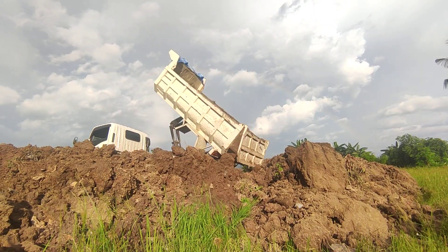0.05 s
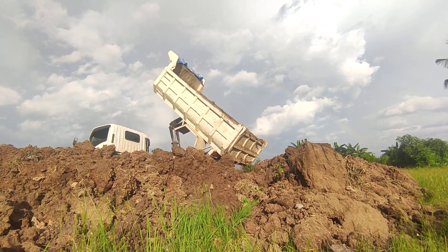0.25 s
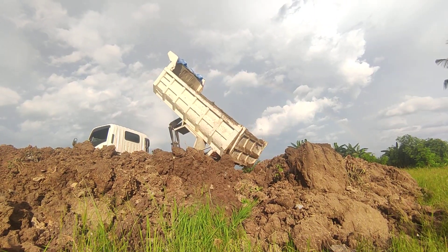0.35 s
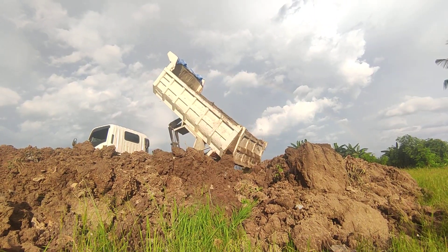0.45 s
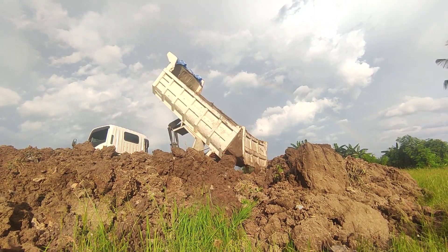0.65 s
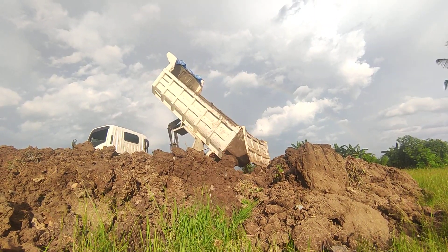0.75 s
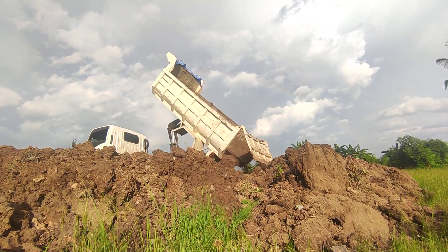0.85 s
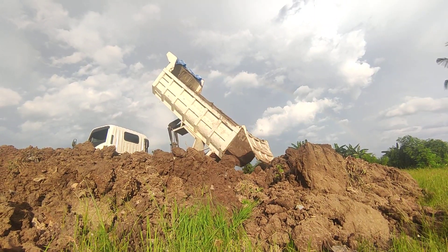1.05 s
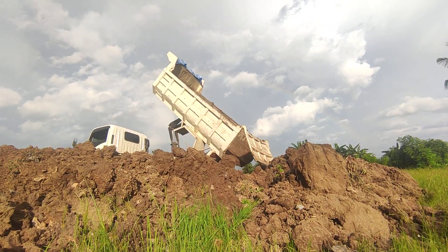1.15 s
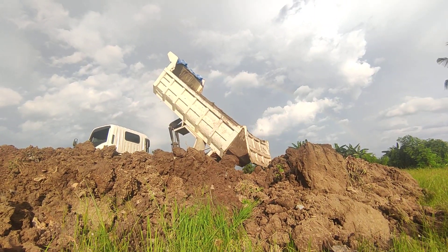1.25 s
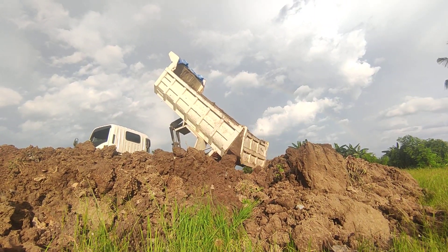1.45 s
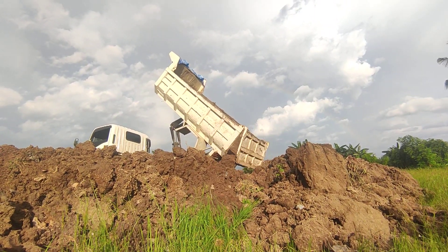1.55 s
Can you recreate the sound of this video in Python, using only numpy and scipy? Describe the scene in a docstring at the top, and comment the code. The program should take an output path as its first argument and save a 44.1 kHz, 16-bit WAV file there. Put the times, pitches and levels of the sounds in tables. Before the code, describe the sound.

A heavy steel tailgate slams at 0.2 s: a sharp clank with rapid rebounds until about 0.26 s, low thumps to 0.31 s, bright latch jingle, and a hollow bed boom fading over roughly half a second. Quiet diesel rumble, sliding soil and faint hiss lie beneath. Small scratchy, perhaps bird-like chirps run throughout, slightly left, with thin whistles near 1.2 and 1.3 s. Open field, little echo.

```python
"""Open field with earth mounds, a tipper truck idling: filtered noise throbs as its diesel and hisses as air.
Soil, grains in coloured noise, slides off. Close by, something small, perhaps a bird, gives scratchy chirps
(clicks and noise through resonances) and two thin whistles (wavering tones). The steel tailgate swings shut
against the raised bed: a noise-burst clank at first contact, every contact ringing through random plate modes,
and decaying sines for the thumps, the gate panel, the boom of the empty body and the bright latch jingle."""
import sys
import numpy as np
from scipy import signal
from scipy.fft import rfft, irfft
from scipy.io import wavfile
from scipy.ndimage import uniform_filter1d

SR = 44100
rng = np.random.default_rng(int(sys.argv[2]) if len(sys.argv) > 2 else 0)


def generate_wav(sig):
    """Save sig (samples, or channels by samples) to the path in sys.argv[1] as 16-bit PCM at SR."""
    pcm = np.round(np.clip(np.atleast_2d(sig).T, -1, 1) * 32767).astype(np.int16)
    wavfile.write(sys.argv[1], SR, pcm)


N = 70560

# stereo image of the broad noises: (frequency [Hz], side minus mid [dB])
STEREO_WIDTH = [(60, -24), (150, -24), (500, -13), (1000, -9), (2000, -6), (4000, -1.5), (12000, -1)]

# sliding soil, loudness: (time [s], level [dB])
SOIL_LEVEL = [(0, -48.5), (.1, -47.5), (.4, -41), (.55, -42), (.75, -38), (.9, -42.5), (1.1, -42),
              (1.25, -45), (1.4, -45), (1.6, -45)]
# sliding soil, colour: (frequency [Hz], relative density [dB per Hz])
SOIL_COLOUR = [(60, -45), (170, 8.5), (260, -8.5), (350, -3), (520, 2), (680, -9.5), (1150, -4.5),
               (1800, -15), (3000, -18.5), (7000, -29.5), (15000, -28)]
CLODS_PER_S, CLOD_SPREAD_DB = 1400, -3.5

# engine rumble, loudness: (time [s], level [dB])
ENGINE_LEVEL = [(0, -45), (.1, -46), (.45, -39), (.8, -43), (1.1, -43.5), (1.35, -43), (1.6, -45)]
# engine rumble, colour: (frequency [Hz], relative density [dB per Hz])
ENGINE_COLOUR = [(20, -15), (45, -13), (75, 0), (110, -0.5), (170, -0.5), (215, -0.5), (260, -10),
                 (500, -30), (1000, -41)]
FIRING_HZ, FIRING_DEPTH = 41, 0.15  # mean rate; depth as a share of the amplitude

# faint outdoor hiss, loudness: (time [s], level [dB])
AIR_LEVEL = [(0, -46.5), (.45, -43.5), (.7, -54), (1.1, -55.5), (1.6, -54.5)]
# faint outdoor hiss, colour: (frequency [Hz], relative density [dB per Hz])
AIR_COLOUR = [(1000, -0.5), (2600, -4), (3600, 7.5), (4400, -5), (5400, 3.5), (6500, 0.5), (7400, -31),
              (9200, -2.5), (12000, -17.5), (15500, -41)]

# scratchy bursts: (start [s], length before release [s], mid-burst level [dB],
#                   resonance [Hz], resonance against rasp [dB])
CHIRP_BURSTS = [(0.016, 0.033, -41, 6050, -7), (0.162, 0.03, -39.5, 5540, -1),
                (0.365, 0.044, -39.5, 5500, -5), (0.493, 0.0098, -46, 3700, 5.5),
                (0.531, 0.054, -42, 5630, -7.5), (0.627, 0.018, -39.5, 3670, -2.5),
                (0.714, 0.0068, -36, 3710, -4.5), (0.767, 0.0046, -37, 3620, -8),
                (0.783, 0.0058, -41, 4620, 2.5), (0.836, 0.017, -39.5, 3780, 1),
                (0.905, 0.0048, -39.5, 4800, -1.5), (0.943, 0.0097, -39, 5040, -15),
                (0.956, 0.025, -40.5, 4840, -4), (1.006, 0.012, -41.5, 5200, -5),
                (1.022, 0.017, -37, 3630, -16), (1.089, 0.014, -40, 3930, 0),
                (1.146, 0.0079, -56, 3500, 8.5), (1.189, 0.011, -39.5, 3680, -0.5),
                (1.211, 0.028, -49.5, 3550, 7), (1.288, 0.068, -45.5, 3300, -2.5),
                (1.41, 0.066, -40.5, 5660, -5.5), (1.539, 0.073, -43.5, 5700, 0.5)]
# rasp under every burst: (frequency [Hz], relative density [dB per Hz])
RASP_COLOUR = [(1500, -2), (2700, -5), (3500, 8.5), (4150, 2.5), (4900, 4), (6200, -7.5), (7400, -16),
               (8600, -10), (10000, -1.5), (12300, -21), (15500, -43.5)]
# left-right tilt of the chirps and whistles: (frequency [Hz], left minus right [dB])
CHIRP_BALANCE = [(3000, 5), (5000, 3), (6500, 6), (9000, -7), (10200, 1.5), (11500, 12), (15000, 46.5)]
# thin whistles: (start [s], length before release [s], mean pitch [Hz], level [dB])
WHISTLE_NOTES = [(1.199, 0.031, 3410, -36), (1.299, 0.047, 3348, -37.5)]
WHISTLE_WOBBLE, WHISTLE_THIRD_DB = .024, -9  # rms share of pitch; third harmonic
CHIRP_ATTACK_S, CHIRP_RELEASE_S = .002, .0035  # release is a time constant
CHIRP_SAG_DB_PER_S, CHIRP_ROUGH_DB = 34, 2.4
# half-width of the resonance in a long burst; short bursts have no time to settle on a narrow one
CHIRP_WIDTH_HZ, CHIRP_SETTLE_S = 196, 0.006
OVERTONE_HZ, OVERTONE_WIDTH_HZ, OVERTONE_DB = 11360, 1500, -19.5
GRAINS_PER_S, GRAIN_DB = 630, -14
PORT_LAG_S = 0.0003578  # the right port hears the chirps later
CHIRP_ECHO_DB, CHIRP_ECHO_T60_S = -8.5, .12

# tailgate contacts: (time [s], level [dB])
GATE_BLOWS = [(0.2031, -1), (0.2146, 1), (0.2236, -2), (0.238, -13), (0.262, -6)]
# the gate's mass lands and lands again: (time [s], level [dB])
GATE_THUMPS = [(0.2031, -1.5), (0.259, -5), (0.312, -10.5)]
THUMP_HZ, THUMP_DB, THUMP_T60_S = 126, -9, 0.074
# first steel-on-steel contact, resonances: (frequency [Hz], half-width [Hz], level [dB])
CLANK_RESONANCES = [(1806, 34, 0.5), (1830, 260, -1.5), (2037, 90, -5), (2773, 50, -3), (3820, 910, -2.5)]
CLANK_DB, CLANK_SPREAD_DB = -8.5, -7  # spread: unshared noise against shared noise
CLANK_HOLD_S, CLANK_T60_S = 0.0034, 0.04
# crowd of weaker plate modes, colour: (frequency [Hz], relative density [dB per Hz])
PLATE_COLOUR = [(30, -43), (70, -9), (120, 3), (205, 1.5), (255, -16.5), (310, -1.5), (420, -1.5),
                (700, -5.5), (1100, -6.5), (1400, -13.5), (2000, -14.5), (2900, -9.5), (4200, -21),
                (6400, -16.5), (7600, -34.5), (9500, -24), (13300, -22), (15000, -71)]
# how long the plate rings: (frequency [Hz], t60 [s])
PLATE_RING = [(80, 0.25), (200, 0.97), (500, 0.4), (1400, 0.22), (3800, 0.18), (10000, 0.14)]
PLATE_DB, PLATE_NOISE_DB = -13.5, -7
PLATE_MODES_PER_HZ, MODE_SPREAD_DB = 0.04, 3.5  # density far up in the treble
# strongest modes of the empty bed: (frequency [Hz], level [dB], t60 [s])
BED_PARTIALS = [(138, 0, .5), (161, -3, .5), (185, -8, .4), (211, -2, .42), (291, -11, .6), (329, -6, .6),
                (357, -12, 1.05), (389, -4, .42), (447, -7, .42), (519, -8, .33), (600, -5, .25),
                (622, -5, .25), (739, -4, .27)]
BED_DB = -12
# swell time constants at BLOOM_HZ, shorter in proportion above: bending waves fill the steel
BED_BLOOM_S, PLATE_BLOOM_S, BLOOM_HZ = 0.035, 0.019, 202
# clearest modes of the gate panel itself: (frequency [Hz], level [dB], t60 [s])
PANEL_PARTIALS = [(840, -5, .25), (903, -7, .47), (1051, -1, .22), (1253, -9, .3), (1747, 5, .1),
                  (2912, -6, .33), (4177, -14, .27)]
PANEL_DB, PANEL_ATTACK_S = -18, 0.0062
# latch strikes: (time [s], level [dB])
LATCH_STRIKES = [(0.2139, -2), (0.2288, -1.5), (0.271, -43), (0.319, -22)]
# modes of the latch: (frequency [Hz], level [dB], t60 [s])
LATCH_PARTIALS = [(8612, 0, .11), (8450, -6, .08), (8620, -27, .55), (9110, -9, .09), (9415, -20, .2),
                  (13750, -17, .09)]
LATCH_DB, LATCH_PAN_DB = -16, -5.5  # pan is left minus right
LATCH_CHATTER_DB, LATCH_ATTACK_S = 2, 0.0022

LOW_CUT_HZ, TOP_HZ = 36, 15200


def undb(db):
    """Decibels to gain."""
    return 10 ** (np.asarray(db) / 20)


def clock():
    """Time of every sample in seconds."""
    return np.arange(N) / SR


def unit(x):
    """Scale to rms 1."""
    return x / np.sqrt(np.mean(x ** 2) + 1e-20)


def over_time(rows):
    """Gain drawn through (time [s], level [dB]) points."""
    return undb(np.interp(clock(), *np.array(rows).T))


def over_pitch(rows, hz):
    """Read (frequency [Hz], value) points on a log-frequency axis."""
    f, v = np.array(rows, float).T
    return np.interp(np.log(np.maximum(hz, 1)), np.log(f), v)


def bins():
    """Frequency of every spectral bin."""
    return np.arange(N // 2 + 1) * SR / N


def colour(x, rows):
    """Filter by (frequency [Hz], gain [dB]) points."""
    return irfft(rfft(x) * undb(over_pitch(rows, bins())), N)


def resonate(x, hz, half_width_hz):
    """A single resonance, down 6 dB at the half-width, at rms 1."""
    response = 1 / (1 + ((bins() - hz) / half_width_hz) ** 2)
    return unit(irfft(rfft(x) * response, N))


def spread(pair):
    """Two unrelated signals to left and right: alike in the bass, apart in the treble."""
    side = undb(over_pitch(STEREO_WIDTH, bins()))
    a, b = rfft(pair)
    left_right = np.array([a + side * b, a - side * b])
    return irfft(left_right / np.sqrt(1 + side ** 2), N)


def noise():
    """Stereo noise, wider towards the treble."""
    return spread(rng.standard_normal((2, N)))


def walk(rate):
    """Smooth random drift of rms 1, about `rate` fresh values a second."""
    k = max(int(SR / rate), 1)
    steps = np.repeat(rng.standard_normal(N // k + 1), k)
    return unit(uniform_filter1d(steps, k)[:N])


def pan(db):
    """Left and right gains for a level difference, left minus right."""
    return undb(np.array([[db], [-db]]) / 2)


def gate(start, length, attack, release):
    """Linear attack, hold and exponential release."""
    t = clock() - start
    return np.clip(t / attack, 0, 1) * np.exp(-np.maximum(t - length, 0) / release)


def fade(t, t60):
    """Decay of 60 dB in t60."""
    return np.exp(-np.log(1000) * t / t60)


def strike(ring, hits):
    """Play a fresh ring() at every (time [s], level [dB]) hit."""
    out = np.zeros((2, N))
    for s, db in hits:
        k = int(s * SR)
        out[:, k:] += undb(db) * ring()[..., :N - k]
    return out


def soil():
    """Clods of all sizes tumble down the steel floor: random clicks within coloured noise."""
    landings = rng.random((2, N)) < CLODS_PER_S / SR
    sizes = undb(CLOD_SPREAD_DB * rng.standard_normal((2, N)))
    clods = landings * rng.standard_normal((2, N)) * sizes
    crumbs = unit(spread(clods)) + undb(-1.5) * noise()
    flicker = undb(0.4 * walk(24.76))
    return unit(colour(crumbs, SOIL_COLOUR)) * over_time(SOIL_LEVEL) * flicker


def engine():
    """Low diesel rumble: noise throbbing with firings at a slightly wandering rate."""
    firing_hz = FIRING_HZ * (1 + 0.035 * walk(9.8))
    phase = 2 * np.pi * np.cumsum(firing_hz) / SR
    throb = noise() * (1 + FIRING_DEPTH * np.cos(phase))
    return unit(colour(throb, ENGINE_COLOUR)) * over_time(ENGINE_LEVEL)


def hiss():
    """Hiss of the open field: coloured stereo noise whose level flickers slightly."""
    flicker = undb(0.37 * walk(31.8))
    return unit(colour(noise(), AIR_COLOUR)) * over_time(AIR_LEVEL) * flicker


def grit():
    """Dense tiny clicks in hiss, the raw scratch of the chirps."""
    clicks = (rng.random(N) < GRAINS_PER_S / SR) * np.sign(rng.standard_normal(N))
    return rng.standard_normal(N) + undb(GRAIN_DB) * unit(clicks)


def scratches():
    """Gritty bursts, each with its own resonance and shared overtones, sagging in level."""
    rasp = unit(colour(grit(), RASP_COLOUR))
    overtones = undb(OVERTONE_DB) * resonate(grit(), OVERTONE_HZ, OVERTONE_WIDTH_HZ)
    out = 0
    for start, length, db, hz, ring_db in CHIRP_BURSTS:
        width = CHIRP_WIDTH_HZ * (1 + CHIRP_SETTLE_S / length)
        ring = resonate(rng.standard_normal(N), hz, width) + overtones
        sag = CHIRP_SAG_DB_PER_S * np.clip(clock() - start - length / 2, -length, length)
        envelope = undb(db - sag) * gate(start, length, CHIRP_ATTACK_S, CHIRP_RELEASE_S)
        out = out + envelope * (rasp + undb(ring_db) * ring)
    return out


def whistles():
    """Thin tones with a third harmonic and a fast random waver in pitch."""
    out = 0
    for start, length, hz, db in WHISTLE_NOTES:
        pitch = hz * (1 + WHISTLE_WOBBLE * walk(1100))
        phase = 2 * np.pi * np.cumsum(pitch) / SR
        tone = unit(np.sin(phase) + undb(WHISTLE_THIRD_DB) * np.sin(3 * phase))
        out = out + undb(db) * gate(start, length, CHIRP_ATTACK_S, CHIRP_RELEASE_S) * tone
    return out


def chirps():
    """Scratches and whistles together, roughened by a fast random level."""
    return (scratches() + whistles()) * undb(CHIRP_ROUGH_DB * walk(800))


def from_left(x):
    """A near sound reaches the left port first, tilted by pitch; the earth mounds scatter a little back."""
    spectrum = rfft(x)
    lean = undb(over_pitch(CHIRP_BALANCE, bins()) / 2)
    lag = np.exp(-2j * np.pi * bins() * PORT_LAG_S)
    direct = irfft(np.array([spectrum * lean, spectrum / lean * lag]), N)
    tail = rng.standard_normal((2, N)) * fade(clock(), CHIRP_ECHO_T60_S)
    scatter = unit(tail) / np.sqrt(N)
    return direct + undb(CHIRP_ECHO_DB) * signal.fftconvolve(x[None], scatter, axes=1)[:, :N]


def clank():
    """First steel-on-steel contact: a resonant noise burst, mostly centred, with a little stereo spread."""
    contact = rng.standard_normal(N) + undb(CLANK_SPREAD_DB) * rng.standard_normal((2, N))
    ring = unit(sum(undb(db) * resonate(contact, hz, width) for hz, width, db in CLANK_RESONANCES))
    return ring * gate(GATE_BLOWS[0][0], CLANK_HOLD_S, 0.0021, CLANK_T60_S / np.log(1000))


def plate_modes():
    """Random mode positions, shared by all blows; in the bass they crowd into a continuum."""
    hz = bins()
    crowding = 1 + (1200 / (hz + 1)) ** 2
    share = np.clip(PLATE_MODES_PER_HZ * SR / N * crowding, 1e-4, 1)
    present = rng.random(len(hz)) < share
    strength = undb(MODE_SPREAD_DB * rng.standard_normal(len(hz)))
    return present * strength / np.sqrt(share)


def plate(shape):
    """The plate's modes after one blow: the treble is at once and brief, the bass swells and stays."""
    t, out = clock(), 0
    ringing = unit(irfft(rfft(noise()) * shape, N)) + undb(PLATE_NOISE_DB) * noise()
    spectrum = rfft(unit(colour(ringing, PLATE_COLOUR)))
    octave = np.log2(np.clip(bins(), 62.5, 16000) / 62.5)
    for k in range(9):  # overlapping octave bands, each with its own swell and decay
        hz = 62.5 * 2 ** k
        band = irfft(spectrum * np.maximum(1 - abs(octave - k), 0), N)
        swell = 1 - np.exp(-t * hz / (PLATE_BLOOM_S * BLOOM_HZ))
        out = out + band * fade(t, over_pitch(PLATE_RING, hz)) * swell
    return out


def thump():
    """A short low heave of the whole gate: one decaying sine."""
    t = clock()
    attack = np.minimum(t * THUMP_HZ, 1)
    return undb(THUMP_DB) * np.sin(2 * np.pi * THUMP_HZ * t) * fade(t, THUMP_T60_S) * attack


def boom():
    """The strongest modes of the empty bed, swelling as bending waves fill it."""
    t, out = clock(), 0
    for hz, db, t60 in BED_PARTIALS:
        swell = 1 - np.exp(-t * hz / (BED_BLOOM_S * BLOOM_HZ))
        out = out + undb(db) * np.sin(2 * np.pi * hz * t) * fade(t, t60) * swell
    return out


def panel():
    """The gate panel's clear partials, quick to speak on contact."""
    t = clock()
    ring = sum(undb(db) * np.sin(2 * np.pi * hz * t) * fade(t, t60) for hz, db, t60 in PANEL_PARTIALS)
    return ring * np.minimum(t / PANEL_ATTACK_S, 1)


def latch():
    """A small loose steel part rings high and chatters in its seat."""
    t, ring = clock(), 0
    for hz, db, t60 in LATCH_PARTIALS:
        cycles = hz * t + rng.random((2, 1)) / 3  # left and right out of phase by a random part
        ring = ring + undb(db) * np.sin(2 * np.pi * cycles) * fade(t, t60)
    chatter = undb(LATCH_CHATTER_DB * walk(350))
    return ring * np.minimum(t / LATCH_ATTACK_S, 1) * chatter


def tailgate():
    """Clank of the first contact, every contact ringing the plate, thumps and boom of the bed, latch jingle."""
    shape = plate_modes()
    plate_rings = undb(PLATE_DB) * strike(lambda: plate(shape), GATE_BLOWS)
    thumps = strike(thump, GATE_THUMPS)
    body = strike(lambda: undb(BED_DB) * boom() + undb(PANEL_DB) * panel(), GATE_BLOWS[:1])
    jingle = undb(LATCH_DB) * pan(LATCH_PAN_DB) * strike(latch, LATCH_STRIKES)
    return undb(CLANK_DB) * clank() + plate_rings + thumps + body + jingle


def scene():
    """Soil, truck, hiss of the open field and chirps."""
    return soil() + engine() + hiss() + from_left(chirps()) + tailgate()


def record(dry):
    """The recorder thins the deep bass, rounds the highest peaks and cuts the top."""
    low_cut = signal.butter(2, LOW_CUT_HZ, "high", fs=SR, output="sos")
    top_cut = signal.ellip(12, .2, 90, TOP_HZ, fs=SR, output="sos")
    thin = signal.sosfilt(low_cut, dry)
    return signal.sosfilt(top_cut, np.tanh(thin))


dry = scene()
out = record(dry)
generate_wav(out)
```